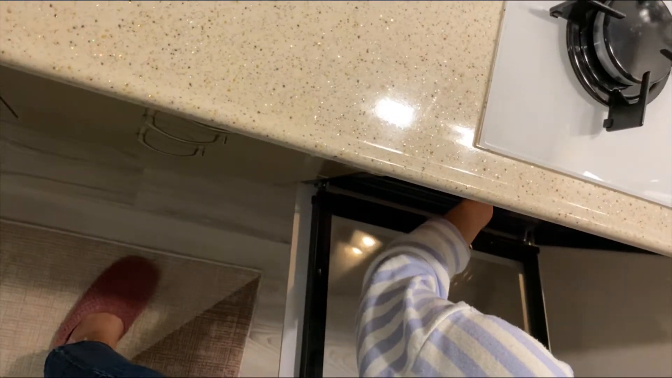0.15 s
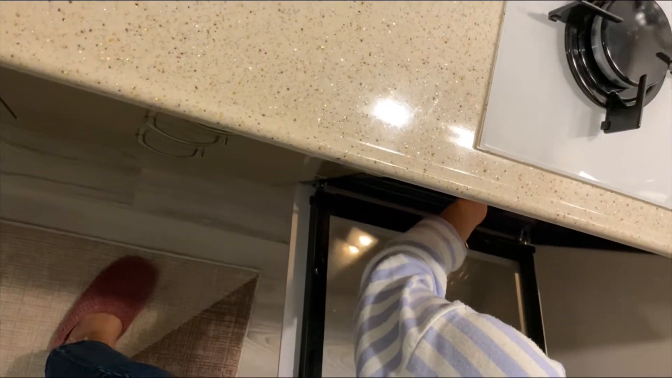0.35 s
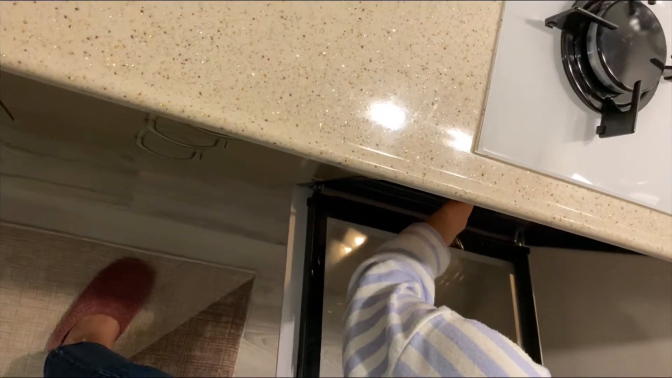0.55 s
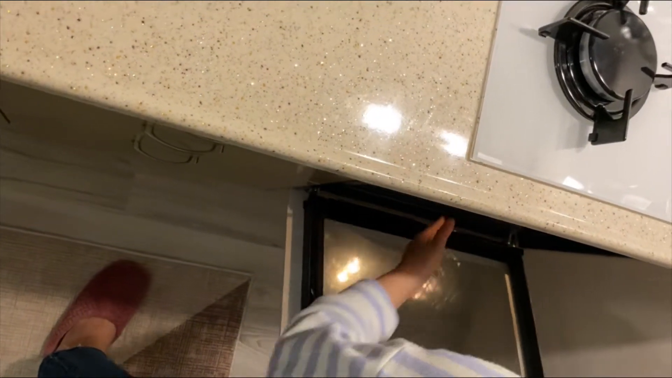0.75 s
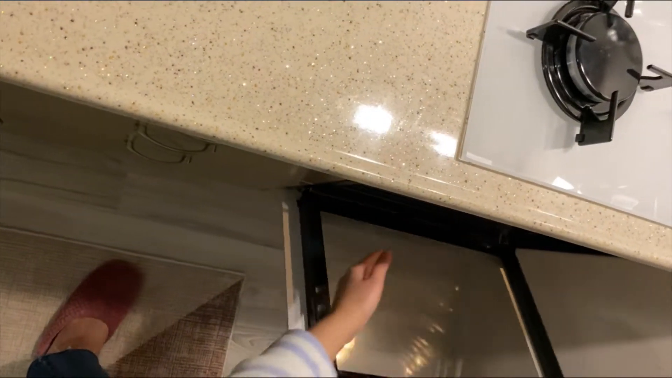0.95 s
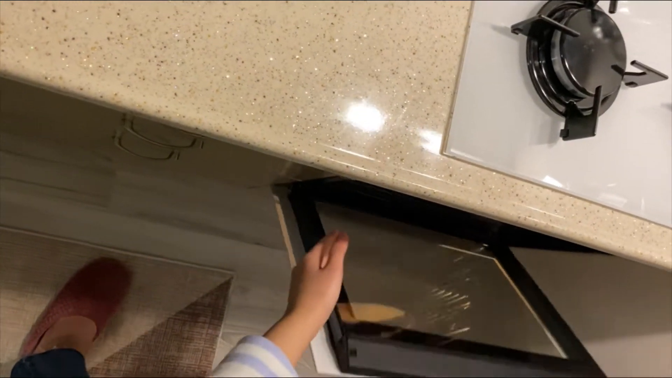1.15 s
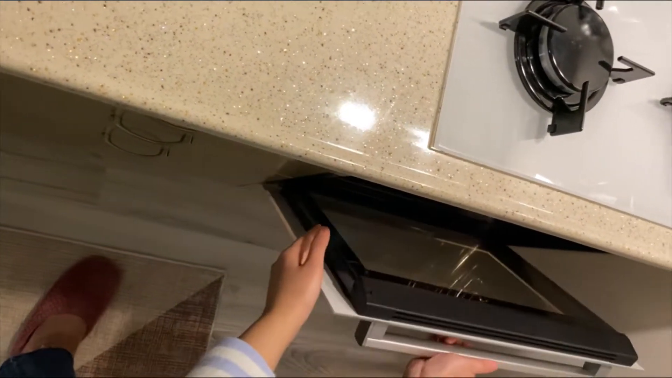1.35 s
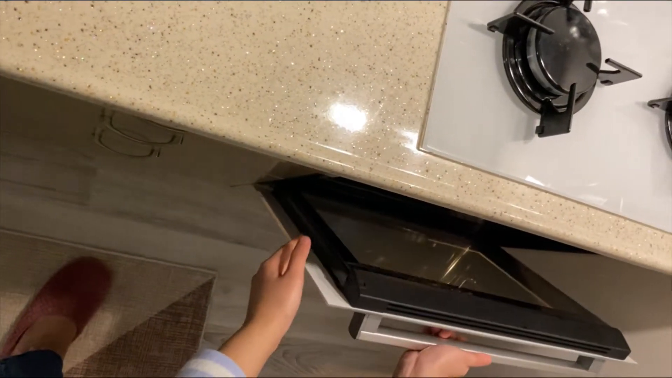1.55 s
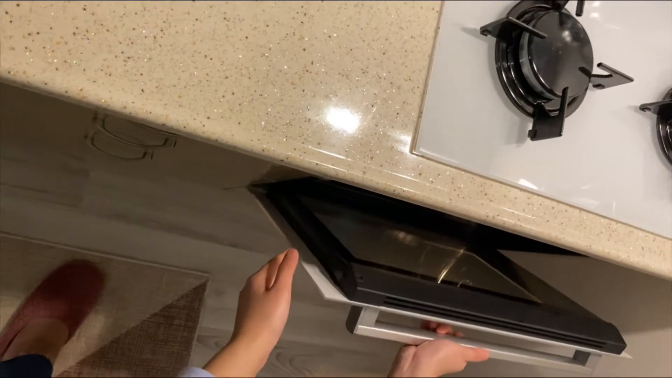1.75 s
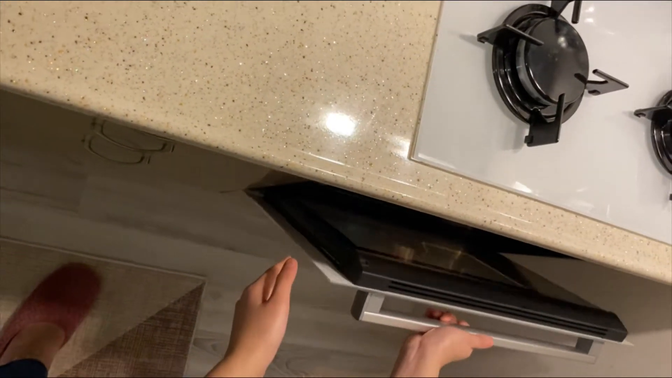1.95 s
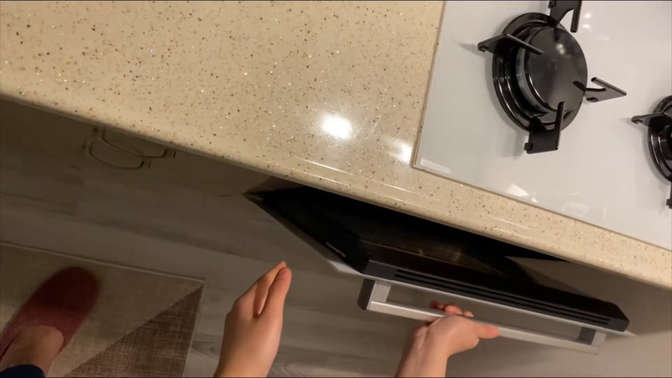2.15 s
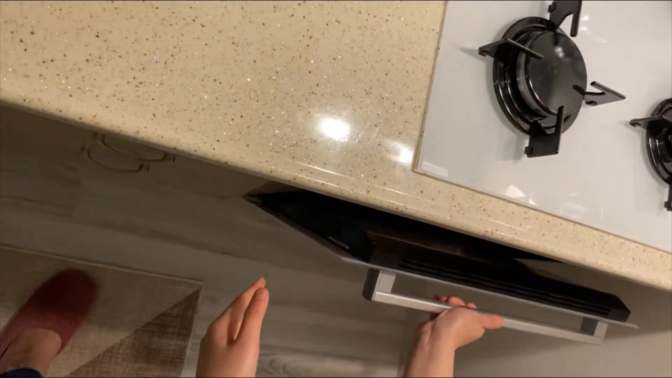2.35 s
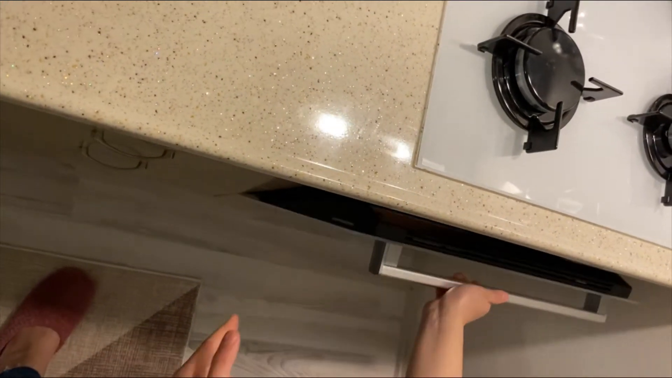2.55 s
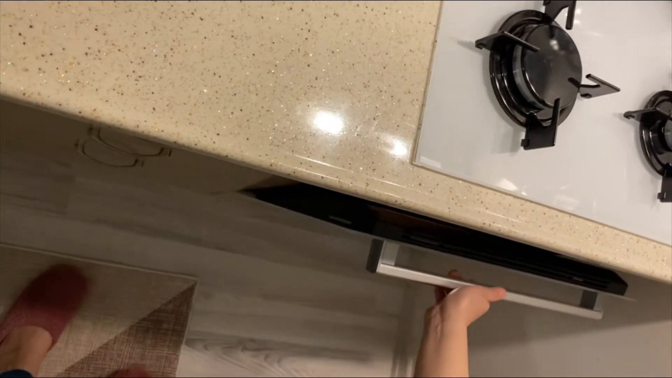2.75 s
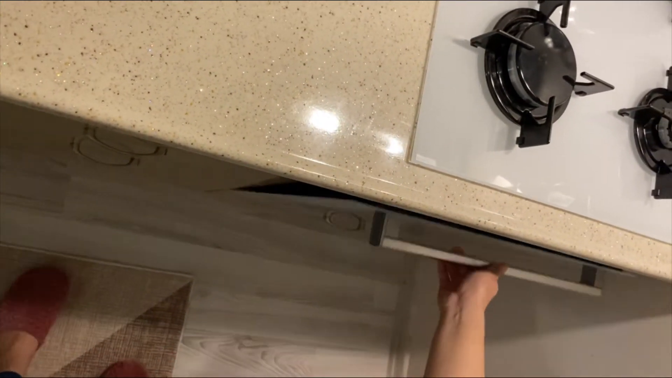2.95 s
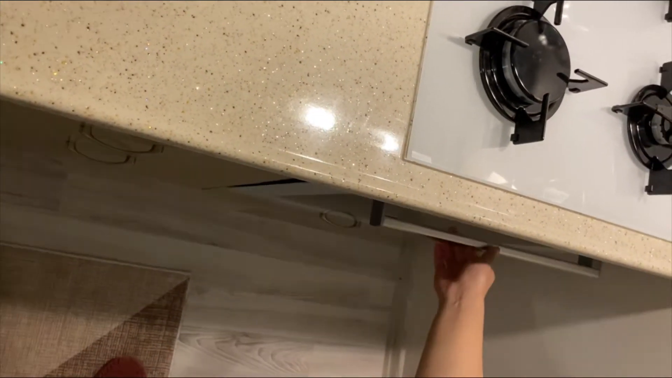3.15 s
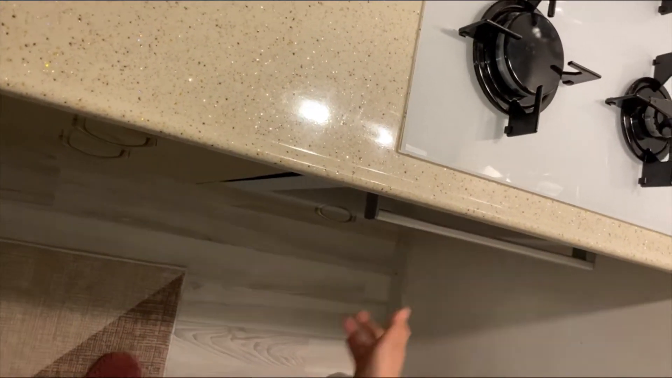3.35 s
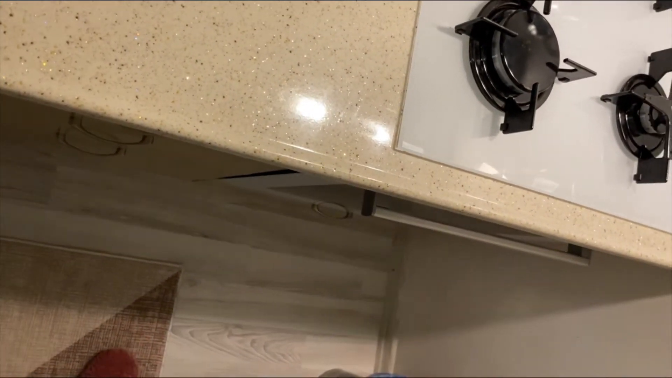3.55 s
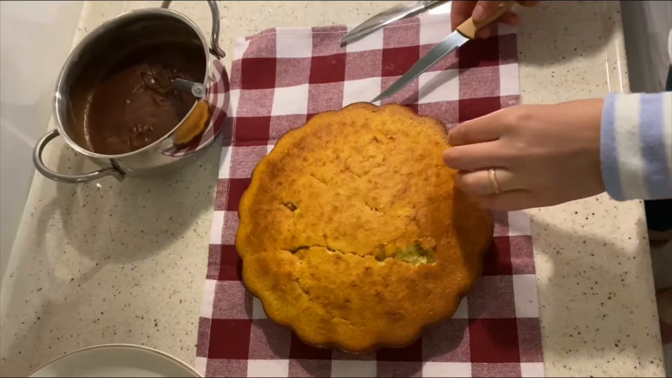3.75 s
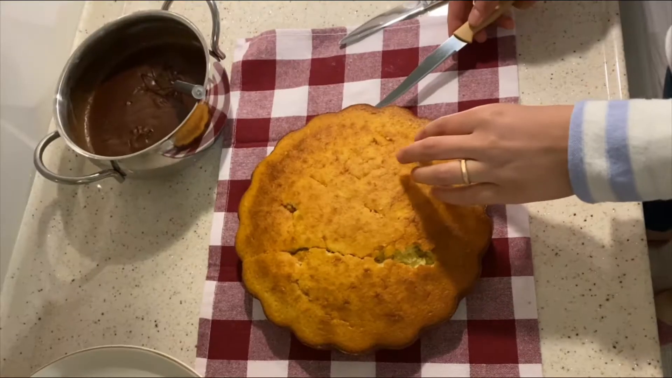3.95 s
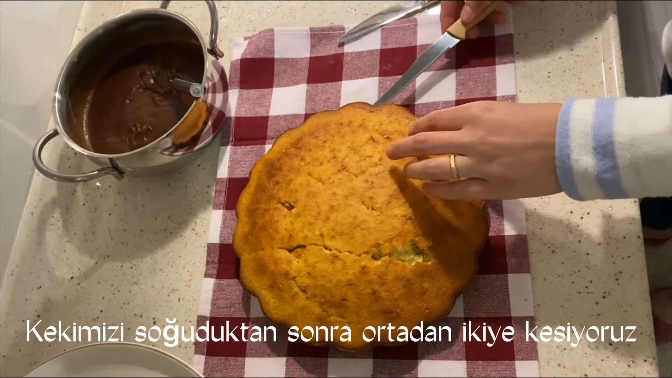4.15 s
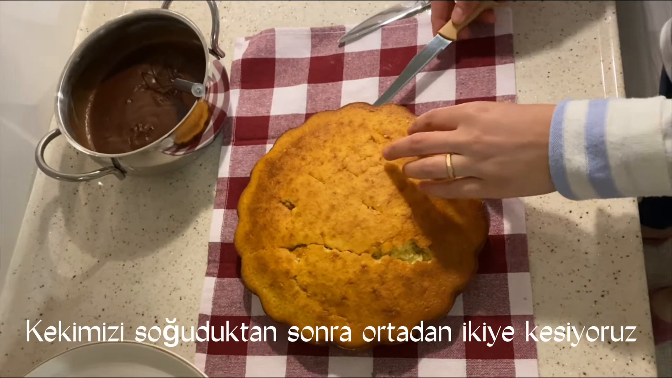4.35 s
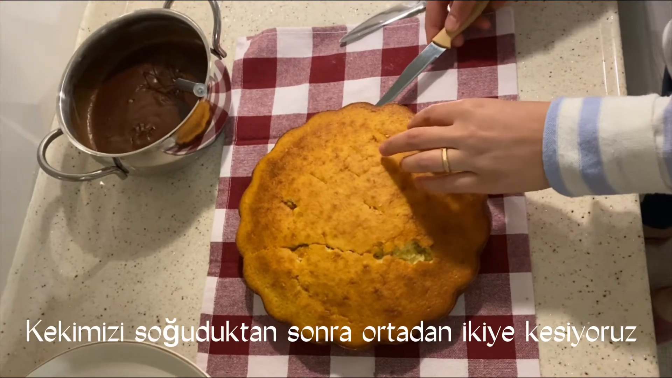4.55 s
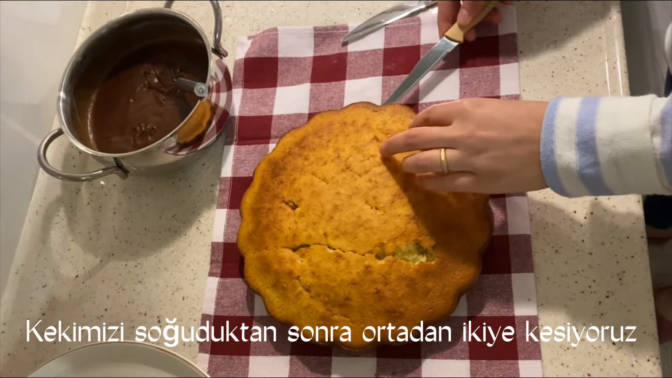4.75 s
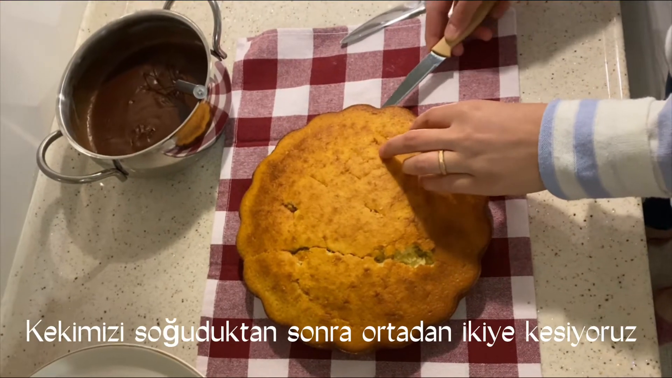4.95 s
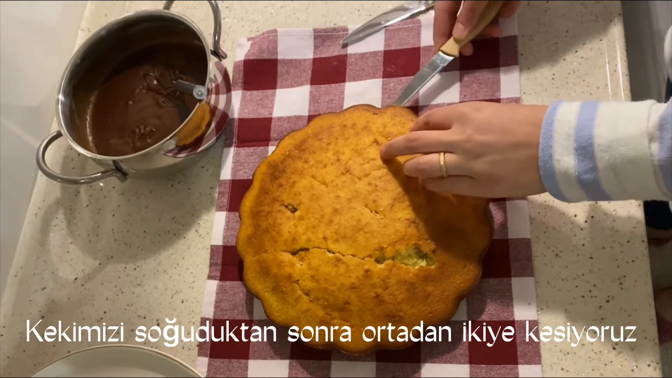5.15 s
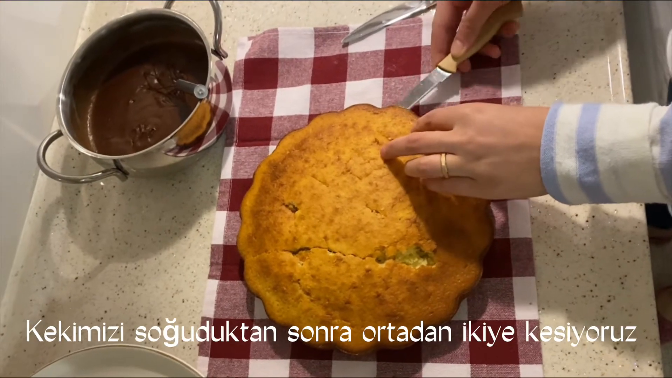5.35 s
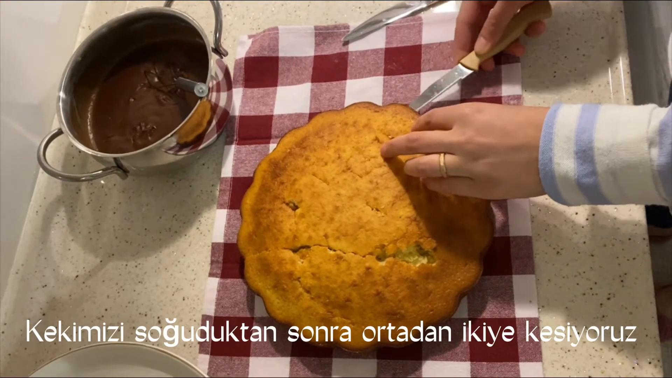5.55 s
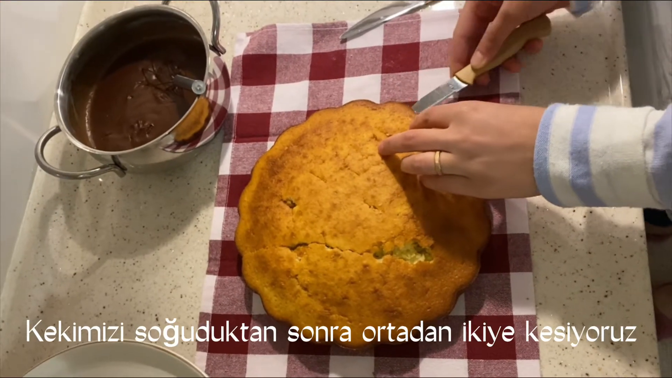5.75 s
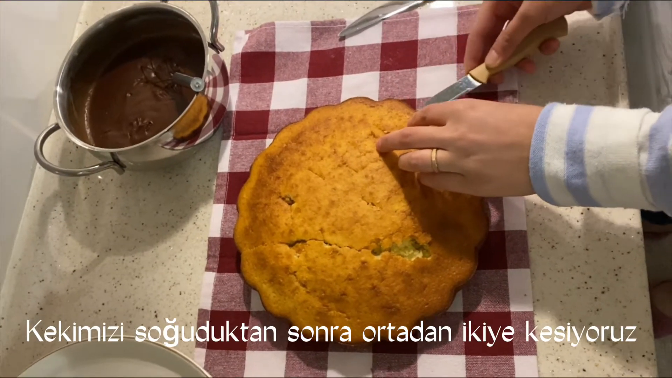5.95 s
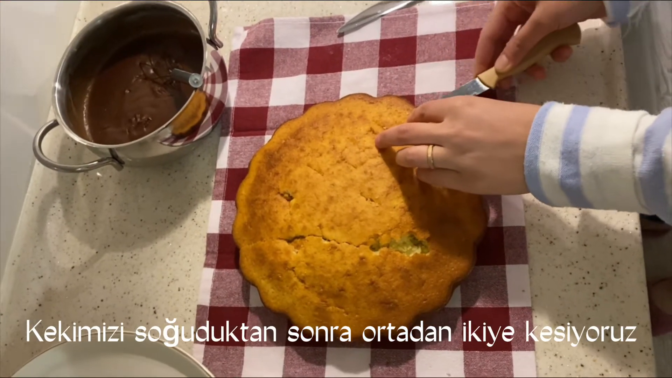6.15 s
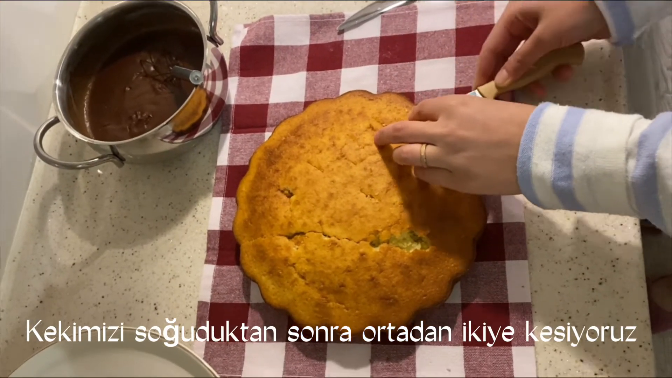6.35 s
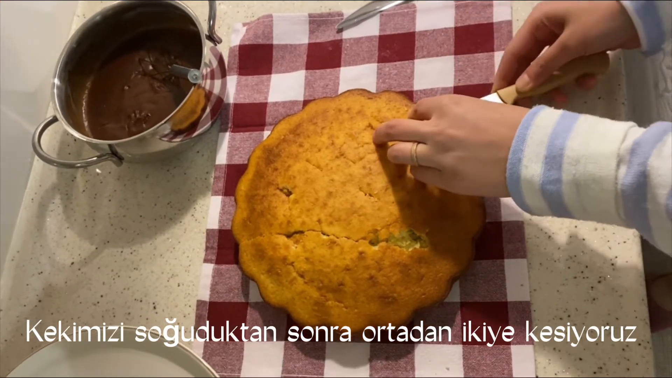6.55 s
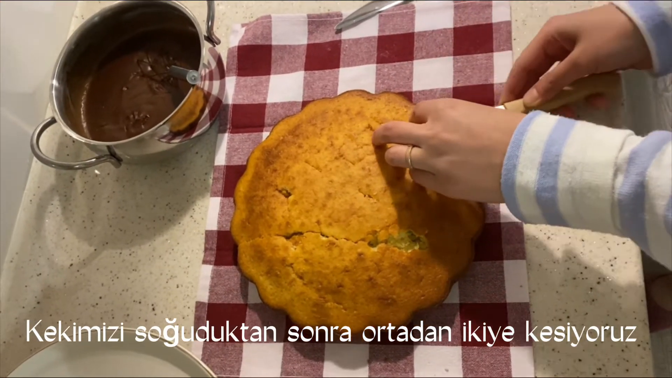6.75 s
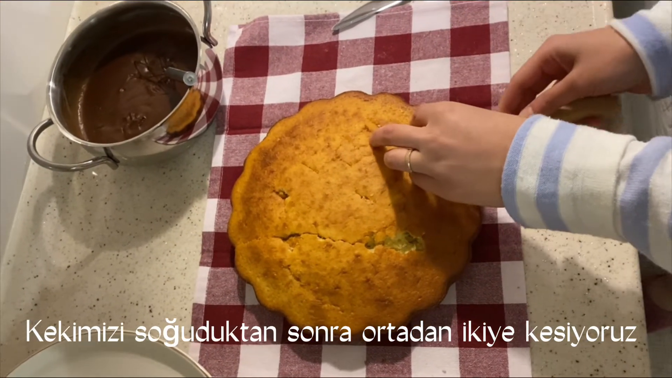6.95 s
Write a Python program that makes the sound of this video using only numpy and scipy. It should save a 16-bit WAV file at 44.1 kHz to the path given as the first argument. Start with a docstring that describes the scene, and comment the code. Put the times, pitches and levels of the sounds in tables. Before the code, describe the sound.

An oven fan blows as the door knocks and thumps shut, then a steady hum with faint knife and hand rubbing.

```python
"""An oven fan blows over a mains hum while the door is lifted, knocks in its hinge and is pushed shut.
The pushes ring the oven box; metal contacts clatter and shake the racks. A sleeve swishes.
After a short silence, a second scene: louder hum, a quiet room, faint ticks, hands and a knife
at a worktop. There the sound stalls once, resumes late and jumps back into step with a blip."""
import sys
import numpy as np
from scipy import signal
from scipy.fft import rfft, irfft, next_fast_len
from scipy.io import wavfile

SR = 44100
rng = np.random.default_rng(int(sys.argv[2]) if len(sys.argv) > 2 else 0)


def master(y):
    """Save y as 16-bit WAV."""
    cut = np.clip(np.atleast_2d(y).T, -1, 1)
    pcm = np.round(cut * 32767)  # scale
    wavfile.write(sys.argv[1], SR, pcm.astype(np.int16))


N = 309008
T = np.arange(N) / SR
SLAM_S, OVEN_END_S, WORKTOP_START_S = 3.0846, 3.6518, 3.6996

# stereo width at the oven and at the worktop: f/Hz, side re mid/dB
OVEN_WIDTH = [(60, -23), (200, -17.5), (380, -12.5), (700, -1.5), (1300, -8.5), (2400, -9.5), (5000, -21),
              (15000, -37)]
WORKTOP_WIDTH = [(60, -23), (200, -21), (380, -3.5), (700, -4), (1300, -2.5), (2400, -2), (5000, -12.5),
                 (15000, -29.5)]


def fan():
    """Air noise, quieter as the door shuts; two fine colourings crossfade for the door's swing."""
    spectrum = [(20, -8), (60, 0), (160, -1.5), (300, -3.5), (480, -8.5), (600, -13.5), (900, -14),
                (1500, -22), (2000, -24), (2600, -25), (3300, -33), (5400, -40.5), (7500, -50),
                (11000, -56.5), (15500, -54)]  # f/Hz, density/dB
    level = [(0, -45.5), (.75, -46.5), (1.25, -45.5), (1.6, -46.5), (2.5, -47.5), (3.1, -49), (3.45, -52.5),
             (3.49, -49), (3.65, -52)]  # t/s, level/dB
    crossfade_rad_per_s = 0.89
    angle = crossfade_rad_per_s * T
    first = coloured(spectrum, OVEN_WIDTH, ripple_db=3.0)
    second = coloured(spectrum, OVEN_WIDTH, ripple_db=2.5)
    return amp(in_time(level)) * (np.cos(angle) * first + np.sin(angle) * second)


def mains_hum(level, overtones, hz=99.92, crest_s=5.7668):
    """Twice the mains frequency, with wavering overtones."""
    phase = 2 * np.pi * hz * (T - crest_s)
    upper = sum(amp(db + 2 * drift(10)) * np.cos(k * phase + rng.uniform(0, 2 * np.pi))
                for k, db in overtones)
    return np.sqrt(2) * amp(in_time(level)) * (np.cos(phase) + upper)


def oven_hum():
    """Mains hum, shaded by the swinging door."""
    level = [(0, -37.5), (.75, -36.5), (.98, -42.5), (1.26, -39), (1.46, -42), (1.51, -37.5), (1.65, -39),
             (2.56, -39), (2.62, -53), (2.8, -42), (3.01, -52), (3.08, -40), (3.21, -40), (3.32, -37),
             (3.6, -39), (3.65, -42)]  # t/s, level/dB
    overtones = [(2, -21), (3, -24.5)]  # harmonic, level/dB
    return mains_hum(level, overtones) * pan(0.15)


def worktop_hum():
    """Nearer mains hum, late on the left; the balance moves as the listener shifts."""
    level = [(3.7, -28), (4.5, -29.5), (5.0, -30), (5.76, -33), (5.9, -33), (7, -33)]  # t/s, level/dB
    overtones = [(2, -31.5), (3, -34.5)]  # harmonic, level/dB
    balance = [(3.7, .4), (5.0, .6), (5.75, .9), (5.95, -1.3), (6.5, -.9), (7, -.2)]  # t/s, left re right/dB
    lag_samples = 8
    hum = mains_hum(level, overtones)
    return np.array([np.roll(hum, lag_samples), hum]) * pan(-in_time(balance) / 2)


def low_tone(hz=82.5, zero_crossing_s=3.6419):
    """Beats with the hum and grows as the box closes; the slam briefly lifts its pitch."""
    level = [(0, -64), (2.3, -62), (2.6, -40.5), (2.8, -59), (3.01, -43), (3.07, -52), (3.22, -32.5),
             (3.32, -39), (3.65, -40)]  # t/s, level/dB
    waver_db, steady_above_db = 3.5, -54
    jolt_hz, settle_s = 5, 0.1
    level_db = in_time(level)
    weakness = np.clip((steady_above_db - level_db) / 10, 0, 1)
    lag_cycles = jolt_hz * settle_s * np.exp(-since(SLAM_S) / settle_s)
    cycles = hz * (T - zero_crossing_s) - lag_cycles
    return amp(level_db + waver_db * weakness * drift(5)) * np.sin(2 * np.pi * cycles)


def box_ring():
    """Hinge knock and slam feed the low modes of door and box through a yielding seal."""
    modes = [(44.6, 0.52, 1, -39, -16.5), (68, 0.48, 0.63, -52, -24), (78.6, 0.36, 0.4, -7.5, -44),
             (90.8, 0.42, -0.92, -53, -18), (98.3, 0.31, -0.88, -14, -45.5), (120.1, 0.58, -0.86, -33, -29),
             (151.3, 1.05, 0.91, -39, -36), (206.6, 0.29, -0.62, -41, -38),
             (281.4, 1.03, -0.98, -51.5, -36), (302.5, 0.3, -1.13, -43, -27.5), (309, 0.15, -0.7, -55, -32),
             (367.4, 0.67, 0.99, -44, -42), (400, 0.65, 0.93, -49, -43), (441, 0.3, .95, -36.5, -57),
             (470, 0.45, 0.86, -52, -39), (532, 0.44, -1.4, -44, -61), (545, 0.5, 1, -44.5, -54)]  # f/Hz, t60/s, signed gain, knock/dB, slam/dB
    # knock, slam: t/s, build-up/cycles, delay/cycles, damping onset/s, damping t60/cycles
    pushes = [(1.295, 1.7, 0, 1.392, 3.5), (3.0846, 0.6, .207, 3.21, 7.2)]
    deep_below_hz = (250, 100)  # knock, slam
    rest_s, rest_t60_s = 3.3, 0.12
    out = np.zeros((2, N))
    for k, (s, build_cycles, delay_cycles, damped_s, damped_cycles) in enumerate(pushes):
        for hz, t60, gain, *level_db in modes:
            age = since(s + delay_cycles / hz)
            envelope = (1 - np.exp(-age * hz / build_cycles)) * amp(level_db[k] - 60 * age / t60)
            if hz < deep_below_hz[k]:  # hand or seal damps the deep modes
                envelope *= amp(-60 * since(damped_s) * hz / damped_cycles)
            else:
                envelope *= amp(-60 * since(rest_s) / rest_t60_s)
            upper = hz > 250
            roughness = amp(0.5 * upper * drift(14))  # loose panels
            out += gain * pan(1.0 * upper) * roughness * envelope * np.sin(2 * np.pi * hz * age)
    return out


def door_clatter():
    """Metal contacts chatter unevenly, crack brightly and shake the racks."""
    hinge_hits = [(1.280, -41.5, 0.1), (1.2845, -40, 0.064), (1.293, -36, 0.072), (1.299, -36.5, 0.07),
                  (1.31, -42.5, 0.28), (1.326, -51, 0.12), (1.356, -50, 0.084), (1.386, -59, 0.14),
                  (1.398, -63, 0.044)]  # t/s, level/dB, t60/s
    slam_hits = [(3.078, -26.5, 0.065), (3.081, -31.5, 0.064), (3.085, -28.5, 0.057), (3.092, -36, 0.055),
                 (3.103, -26, 0.048), (3.117, -37, 0.26), (3.134, -34, 0.035), (3.1475, -36.5, 0.14),
                 (3.186, -44.5, 0.1), (3.206, -59, 0.21), (3.224, -53, 0.36), (3.465, -58, 0.21)]  # t/s, level/dB, t60/s
    hard_hits = [(1.2925, -50, .03), (1.2985, -44, .04), (3.079, -45.5, 0.082), (3.148, -54, 0.028)]  # t/s, level/dB, t60/s
    hinge_spectrum = [(150, -32), (350, 10), (550, 0), (760, 1), (1120, 1.5), (1400, -7), (2500, -4),
                      (4800, -14), (7000, -23), (10300, -20.5), (15500, -33)]  # f/Hz, density/dB
    slam_spectrum = [(150, -13), (300, -1), (400, -3), (550, -10.5), (1200, -9.5), (2200, -5),
                     (3500, -17.5), (5800, -23), (8700, -28.5), (12000, -39.5), (15500, -52)]  # f/Hz, density/dB
    width = [(100, -30), (300, -12), (650, 0.5), (1400, -9), (3000, -1), (7000, -14.5), (15000, -4)]  # f/Hz, side re mid/dB
    hinge, slam = bursts(hinge_hits), bursts(slam_hits)
    chatter = amp(0.42 * drift(100))
    clatter = hinge * coloured(hinge_spectrum, width) + slam * coloured(slam_spectrum, width)
    cracks = bursts(hard_hits, rise_s=0.0005) * np.diff(rng.standard_normal(N + 1))
    return chatter * clatter + cracks + racks(hinge, slam)


def racks(hinge, slam):
    """Racks and sheet metal ring from the contacts and from the latch snapping home and rebounding."""
    modes = [(740, 0.069, -44, -47, -60), (877, 0.15, -37, -51, -53), (927, 0.098, -43, -53, -55),
             (1130, 0.18, -36.5, -50, -56), (1165, 0.2, -45, -43, -51), (1224, 0.14, -42, -49, -54),
             (1542, .11, -44, -51, -54), (1630, 0.15, -50, -46, -47), (1850, 0.1, -44, -47, -46),
             (1950, 0.12, -45, -41, -48), (2160, 0.2, -47, -47, -53), (2233, 0.062, -42, -53, -48),
             (2330, 0.079, -49, -48, -54), (2400, 0.07, -46, -41, -52), (2550, 0.19, -49, -51, -55),
             (2790, .09, -51, -52, -45), (3050, 0.12, -49, -48, -50), (3130, .08, -43, -51, -52),
             (3420, .08, -57, -43, -54), (3760, 0.066, -40, -45, -52), (4280, 0.043, -47, -50, -54),
             (5000, .04, -49, -46, -56)]  # f/Hz, t60/s, hinge drive/dB, slam drive/dB, latch drive/dB
    latch_hits = [(3.1485, 2.5), (3.1555, -3)]  # t/s, level/dB
    latch = impulses(latch_hits)
    out = np.zeros((2, N))
    for hz, t60, hinge_db, slam_db, latch_db in modes:
        shake = (amp(hinge_db) * hinge + amp(slam_db) * slam) * rng.standard_normal(N)
        left_db = rng.normal(0.5, 2.7)
        out += ring(shake + amp(latch_db) * latch, hz, t60) * pan(-left_db)
    return out


def snap():
    """One dry click to the right, after the door has settled."""
    click = (3.5362, -39.5, [(1800, -5, .006), (3400, 0, .007), (5100, -2, .007), (9000, -10, .004)])  # t/s, level/dB, modes (f/Hz, gain/dB, t60/s)
    s, level_db, modes = click
    force = impulses([(s, level_db)])
    return sum(amp(db) * ring(force, hz, t60) for hz, db, t60 in modes) * amp([[-3], [2]])


def sleeve():
    """Cloth swishes: swells of bright noise."""
    swishes = [(0, .02, 0.071, -65), (.45, 0.18, 0.37, -76.5), (.9, 0.15, 0.19, -70),
               (1.05, .06, 0.37, -72.5), (1.68, .1, 0.13, -78), (2.3, 0.19, 0.22, -72),
               (2.72, 0.29, 1, -70.5), (3.485, 0.033, 0.1, -65), (3.64, 0.13, 0.084, -69)]  # peak/s, rise/s, fall/s, level/dB
    spectrum = [(1200, -20), (2500, -1), (5000, 1), (9000, -4), (12000, -4), (15500, -12.5)]  # f/Hz, density/dB
    return swells(swishes) * coloured(spectrum, OVEN_WIDTH)


def knife_strokes():
    """Hands and knife rub, each stroke with its own brightness; crumbs catch under the blade."""
    strokes = [(4.15, 0.26, 0.24, -72, 4.5), (4.38, 0.092, 0.1, -78, 3.5), (4.52, 0.049, 0.034, -68.5, 2.5),
               (4.73, 0.045, 0.032, -71, 3.5), (4.9, 0.064, 0.097, -70.5, 1), (4.96, 0.12, 0.096, -70, 4.5),
               (5.02, 0.071, 0.068, -71, 2), (5.16, 0.057, 0.05, -66, 1), (5.35, 0.097, 0.11, -61.5, 3),
               (5.7, 0.081, 0.096, -67.5, 1), (5.86, .03, 0.046, -59, -3.5), (6.02, 0.033, 0.22, -66, 1.2),
               (6.321, 0.018, 0.15, -62.5, 1.5), (6.64, 0.073, 0.089, -84, 1),
               (6.750, 0.0055, 0.11, -64, 5), (6.78, 0.024, 0.063, -72, -1),
               (6.923, 0.0069, 0.065, -57, -3.5), (6.95, .02, .1, -70, 5)]  # peak/s, rise/s, fall/s, level/dB, bright re dull/dB
    spectrum = [(600, -27.5), (1500, 0), (2800, 5.5), (4500, -6), (6500, -10.5), (9000, -22.5),
                (12000, -10), (15500, -25)]  # f/Hz, density/dB
    split_hz, crumbs_per_s, crumb_gain = 2600, 520, 0.593
    rub = coloured(spectrum, WORKTOP_WIDTH)
    catches = (rng.random(N) < crumbs_per_s / SR) * rng.exponential(1, N)
    grain = amp(1.5 * drift(80)) * (1 + crumb_gain * signal.lfilter([1], [1, -0.97], catches))
    bright = swells((*timing, db + tilt_db / 2) for *timing, db, tilt_db in strokes)
    dull = swells((*timing, db - tilt_db / 2) for *timing, db, tilt_db in strokes)
    return grain * (bright * filtered(rub, split_hz, "high") + dull * filtered(rub, split_hz, "low"))


def ticks():
    """Faint noise bursts over a weak steady drive, in two bright resonances."""
    timed = [(3.7587, -87), (3.855, -70), (3.9074, -74), (3.9737, -71), (4.081, -80), (4.3154, -75),
             (4.3469, -72), (4.3713, -76), (4.4726, -72), (4.5205, -79), (4.5898, -71.5), (4.6751, -69),
             (4.6986, -82), (4.8757, -71), (5.0238, -69), (5.1186, -76), (5.1475, -75), (5.18, -72),
             (5.255, -83), (5.4394, -76), (5.5192, -78), (5.5626, -76), (5.593, -67), (6.0645, -66.5),
             (6.2296, -75), (6.3129, -68), (6.335, -69), (6.6037, -73.5), (6.6312, -73), (6.71, -68),
             (6.7619, -71), (6.775, -66), (6.8157, -69), (6.8552, -68.5)]  # t/s, drive/dB
    modes = [(9620, 4.5, 0.004), (14300, -4.5, 0.003)]  # f/Hz, gain/dB, t60/s
    weak_count, rise_s, burst_t60_s, trim_db = 8, 0.003, 0.036, -21.5
    when, softness = rng.random((weak_count, 2)).T
    weak = zip(WORKTOP_START_S + when * (T[-1] - WORKTOP_START_S), -90 - 4 * softness)
    drive = bursts([(s - rise_s, db, burst_t60_s) for s, db in [*timed, *weak]], rise_s)
    drive += amp(-93.5 + 3.4 * drift(25))
    return sum(amp(db + trim_db) * ring(ring(drive * rng.standard_normal(N), hz, t60), hz, t60)
               for hz, db, t60 in modes)


def room():
    """Wavering background noise with a fine, uneven colouring."""
    spectrum = [(20, -16.5), (60, 2.5), (140, 2), (330, -5.5), (370, -11.5), (650, -16.5), (900, -16),
                (1600, -28), (2150, -25), (2400, -32), (5000, -45), (7500, -53.5), (8600, -33.5),
                (10000, -42), (12000, -43.5), (15500, -54)]  # f/Hz, density/dB
    level = [(3.7, -48.5), (4.6, -49.5), (5.3, -50), (5.5, -48.5), (5.9, -50), (6.1, -49), (7, -49.5)]  # t/s, level/dB
    return amp(in_time(level) + drift(11)) * coloured(spectrum, WORKTOP_WIDTH, ripple_db=3.0)


def rumble():
    """Deep noise as the listener settles."""
    level = [(3.7, -42.5), (3.9, -47.5), (4.0, -77.5), (7.0, -83)]  # t/s, level/dB
    return amp(in_time(level)) * noise_band(20, 45, order=2)


def whines():
    """Narrow flickering noise bands, the highest a thin whistle."""
    bands = [(174, 2.3, -70), (273.8, 5.7, -60), (445, 4.8, -72), (542, 18, -75), (780, 9, -73.5),
             (930, 16, -84), (2100, 90, -77.5)]  # f/Hz, width/Hz, level/dB
    whistle_level = [(3.7, -88), (4.0, -86.5), (4.2, -84.5), (4.62, -84), (4.8, -98.5), (5.2, -92.5),
                     (5.5, -83.5), (5.75, -84), (6.0, -93), (6.4, -82), (6.55, -81), (6.7, -83), (7, -89)]  # t/s, level/dB
    whistle_hz, whistle_width_hz = 5114, 150
    whistle_db = in_time(whistle_level) + 1.5 * drift(12)
    out = np.zeros(N)
    for hz, width_hz, db in [*bands, (whistle_hz, whistle_width_hz, whistle_db)]:
        band = noise_band(hz - width_hz / 2, hz + width_hz / 2, order=1)
        out += amp(db + 0.43 * drift(5.3) + 2 * drift(0.3)) * band
    return out


def ping(start_s=3.825, fade_s=3.9, t60_s=0.25, hz=3200, level_db=-72):
    """One short, faint, thin tone."""
    envelope = ramp(start_s, 0.02) * amp(level_db - 60 * since(fade_s) / t60_s)
    return envelope * np.sin(2 * np.pi * hz * T)


def ports(x, lead):
    """Two microphone ports: the left leads by a frequency-dependent phase."""
    size = next_fast_len(N)
    lead_rad = np.interp(np.arange(size // 2 + 1) * SR / size, *np.transpose(lead))
    return irfft(rfft(x, size) * np.exp(0.5j * np.outer([1, -1], lead_rad)), size)[:, :N]


def stall(x, stop_s=5.7677, resume_s=5.7921, late_s=0.025, in_step_s=5.8443):
    """The stream stops, resumes late and jumps back into step with a falling blip."""
    late = np.roll(x, round(late_s * SR), axis=1)
    fade = ramp(in_step_s, 0.019)
    out = np.where(T < stop_s, x, (T >= resume_s) * ((1 - fade) * late + fade * x))
    age = since(in_step_s)
    blip_cycles = 1.09 * np.log((age + 0.0001) / 0.0005)  # pitch falls as 1/age
    blip_db = -41.5 + 14.6 * ramp(in_step_s, 0.0071) - 60 * age / 0.33
    gate = ramp(in_step_s, 0.00026) * np.clip(2 - age / 0.0099, 0, 1)
    return out + gate * amp(blip_db) * np.cos(2 * np.pi * blip_cycles) * pan(1.5)


def amp(db):
    """dB to gain."""
    return 10 ** (np.asarray(db) / 20)


def pan(right_db):
    """Stereo gains: right up, left down by right_db."""
    return amp(right_db * np.array([[-1], [1]]))


def since(s):
    """Seconds after s; 0 before."""
    return np.maximum(T - s, 0)


def ramp(start_s, length_s):
    """Linear rise from 0 to 1."""
    return np.minimum(since(start_s) / length_s, 1)


def in_time(curve):
    """Breakpoints to one value per sample."""
    return np.interp(T, *np.transpose(curve))


def at_hz(points, hz):
    """Breakpoints read on a log-frequency axis."""
    points_hz, db = np.transpose(points)
    return np.interp(np.log(hz), np.log(points_hz), db)


def drift(rate_hz):
    """Slow random wander, unit spread."""
    hop, warmup = 40, 2000
    r = np.exp(-2 * np.pi * rate_hz * hop / SR)
    slow = signal.lfilter([1], [1, -2 * r, r * r], rng.standard_normal(N // hop + warmup + 2))[warmup:]
    return np.interp(np.arange(N) / hop, np.arange(len(slow)), slow / slow.std())


def filtered(x, hz, kind, order=2):
    """Maximally flat filter."""
    return signal.sosfilt(signal.butter(order, hz, kind, fs=SR, output="sos"), x)


def noise_band(low_hz, high_hz, order):
    """Band noise, unit rms."""
    band = filtered(rng.standard_normal(N), [low_hz, high_hz], "band", order)
    return band / band.std()


def coloured(spectrum, width, ripple_db=0):
    """Mid/side noise, unit mid rms; a fine random ripple roughens the spectrum."""
    size = next_fast_len(N)
    hz = np.maximum(np.arange(size // 2 + 1) * SR / size, 1)
    ripple = np.interp(np.log(hz), np.linspace(3, 10, 260), rng.standard_normal(260))
    shape_db = at_hz(spectrum, hz) + ripple_db * ripple * np.minimum(2500 / hz, 1)
    bins = rfft(rng.standard_normal((2, size))) * amp(shape_db)
    bins[1] *= amp(at_hz(width, hz))
    mid, side = irfft(bins, size)[:, :N]
    return np.array([mid + side, mid - side]) / mid.std()


def ring(force, hz, t60_s):
    """Resonator: a unit impulse starts a decaying unit sine."""
    r, w = amp(-60 / (t60_s * SR)), 2 * np.pi * hz / SR
    return signal.lfilter([0, np.sin(w)], [1, -2 * r * np.cos(w), r * r], force + 1e-18)


def impulses(hits):
    """One-sample kicks."""
    out = np.zeros(N)
    for s, db in hits:
        out[round(s * SR)] = amp(db)
    return out


def bursts(hits, rise_s=0.0025):
    """Envelope: fast rise and exponential decay per hit."""
    out = np.zeros(N)
    for s, db, t60 in hits:
        span = slice(int(s * SR), int((s + 2 * t60) * SR))
        age = np.maximum(T[span] - s, 0)
        out[span] += np.minimum(age / rise_s, 1) * amp(db - 60 * age / t60)
    return out


def swells(rows, edge_db=18.5, roundness=1.3):
    """Envelope: rounded peaks, edge_db down at one rise or fall time."""
    return sum(amp(db - edge_db * np.maximum((s - T) / rise_s, (T - s) / fall_s) ** roundness)
               for s, rise_s, fall_s, db in rows)


def scene():
    """Oven, short silence, worktop."""
    oven_lead = [(0, 0), (1000, -.1), (2500, .7), (3100, 1.2), (5200, .4), (6600, 2.6), (8200, 3.7),
                 (10300, 6.3), (13300, 9.4), (16500, 12.6)]  # f/Hz, left lead/rad
    worktop_lead = [(0, 0), (340, .2), (690, -2.6), (2400, -3.0), (3600, -5.3), (5200, -5.8), (6600, -3.7),
                    (8200, -2.6), (10300, 0), (13300, 3.1), (16500, 6.3)]  # f/Hz, left lead/rad
    oven = low_tone() + fan() + sleeve() + oven_hum() + box_ring() + door_clatter() + snap()
    worktop = worktop_hum() + room() + knife_strokes() + rumble() + ticks() + whines() + ping()
    oven_gate = np.clip((OVEN_END_S - T) / 0.002, 0, 1)
    return ports(oven, oven_lead) * oven_gate + ports(worktop, worktop_lead) * (T >= WORKTOP_START_S)


def record(dry):
    """The stall, then a steep treble cut."""
    stopband_hz = 16600
    return signal.sosfilt(signal.cheby2(12, 70, stopband_hz, fs=SR, output="sos"), stall(dry))


dry = scene()
out = record(dry)
master(out)
```